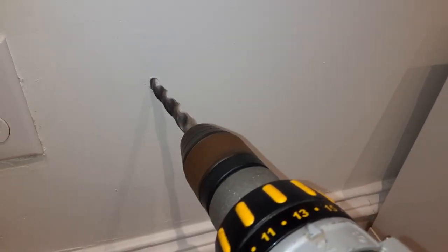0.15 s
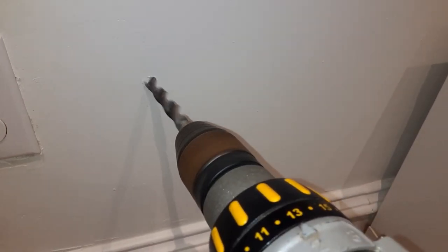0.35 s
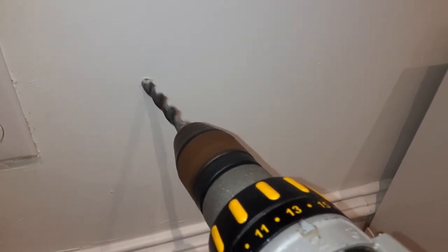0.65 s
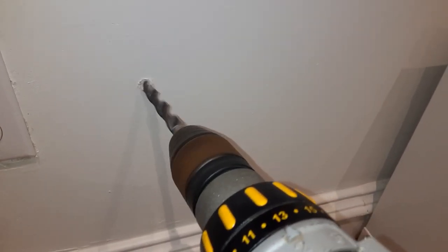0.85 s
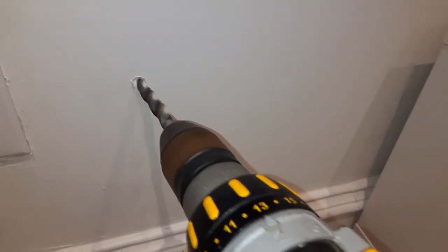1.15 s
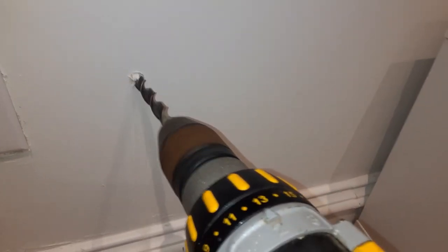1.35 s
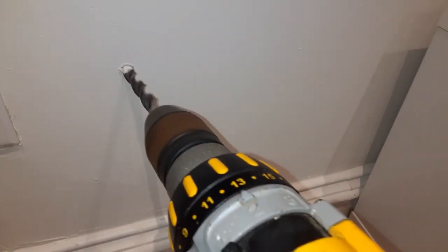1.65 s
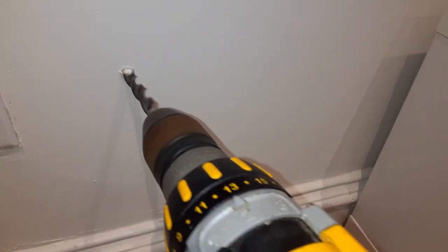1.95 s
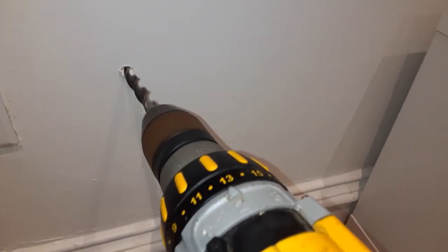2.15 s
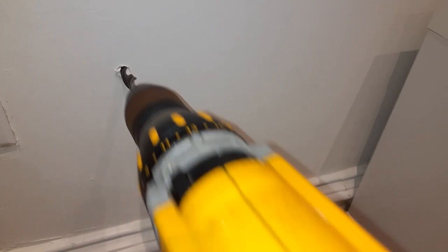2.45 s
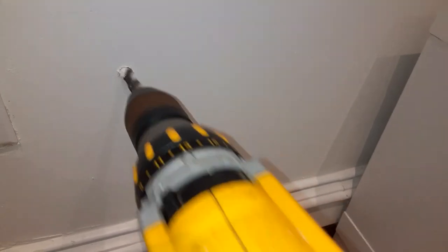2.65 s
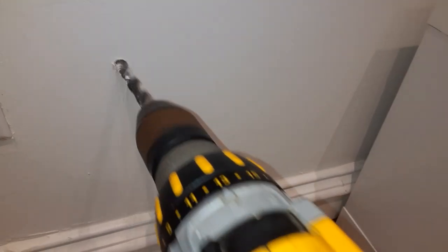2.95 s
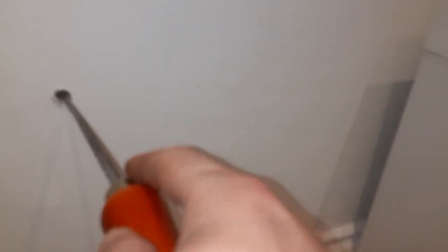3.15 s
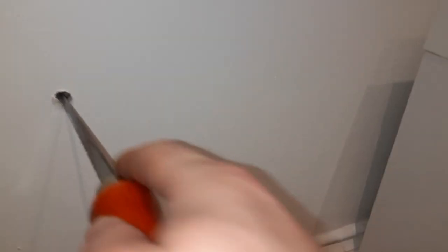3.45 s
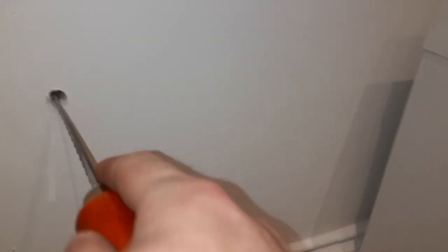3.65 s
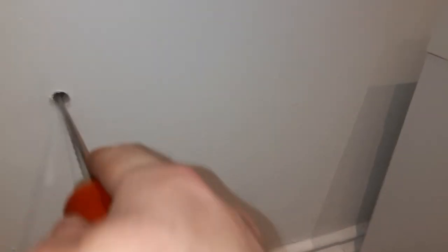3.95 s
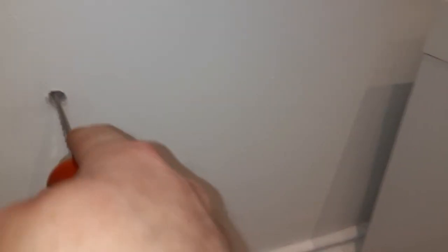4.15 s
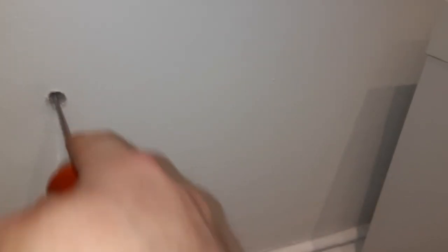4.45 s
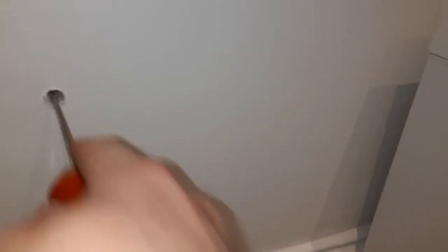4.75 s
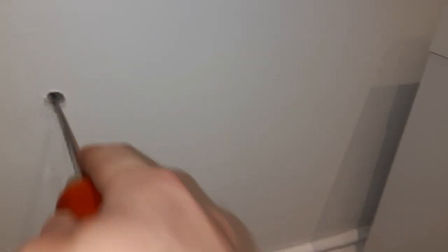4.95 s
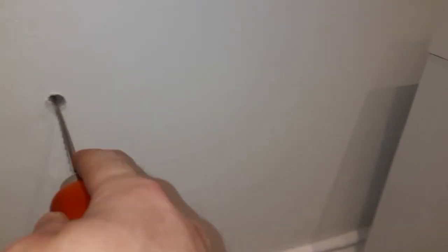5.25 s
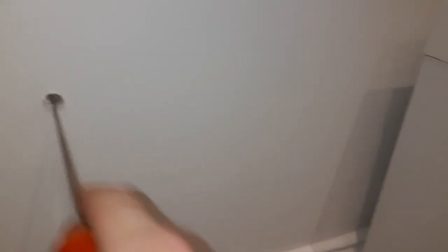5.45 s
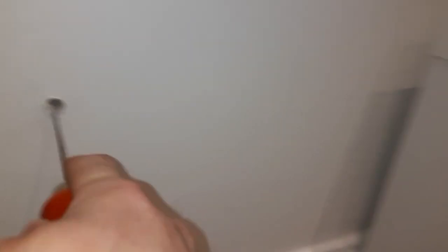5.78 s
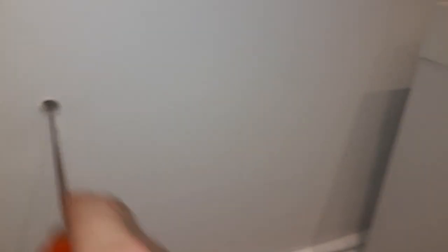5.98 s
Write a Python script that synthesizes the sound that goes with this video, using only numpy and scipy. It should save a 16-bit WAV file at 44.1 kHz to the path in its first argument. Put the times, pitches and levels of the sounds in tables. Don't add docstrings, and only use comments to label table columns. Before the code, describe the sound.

In a small quiet room, close to the microphone, a cordless drill spins up with short high squeals, then holds a steady whine with gear rattle and fan hiss. Dull knocks shake the hollow wall. Halfway it cuts off abruptly to a jab saw, hesitant at first, then working quickly to and fro with booming thumps, gritty hiss and crackling chips.

```python
import sys
import numpy as np
from scipy import signal
from scipy.fft import rfft, irfft
from scipy.io import wavfile
from scipy.ndimage import uniform_filter1d

SR = 44100
rng = np.random.default_rng(int(sys.argv[2]) if len(sys.argv) > 2 else 0)


def invert_db(x):
    u = np.asarray(x, float) / 20
    return 10 ** u


def master(y):
    cut = np.clip(np.atleast_2d(y).T, -1, 1)
    pcm = np.round(cut * 32767)
    wavfile.write(sys.argv[1], SR, pcm.astype(np.int16))


N = 269892
T = np.arange(N) / SR
HZ = np.maximum(np.arange(N // 2 + 1) * SR / N, 1)


def level(x, db):
    return x * invert_db(db) / np.sqrt(np.mean(x ** 2))


def along(table, hz):
    f, v = np.transpose(table)
    return np.interp(np.log(hz), np.log(f), v)


def curves(table):
    s, *columns = np.transpose(table)
    return [np.interp(T, s, c) for c in columns]


def band(x, lo_hz, hi_hz):
    edges_hz = [lo_hz, min(hi_hz, .45 * SR)]
    return signal.sosfilt(signal.butter(3, edges_hz, "band", fs=SR, output="sos"), x)


def walk(rate_hz):
    k = int(SR / rate_hz)
    held = np.repeat(rng.standard_normal(N // k + 1), k)
    return 0.93 * uniform_filter1d(uniform_filter1d(held, k), k)[:N]


def hump(start_s, end_s, edge_s, fall=1.):
    rise = 1 + np.exp(np.clip((start_s - T) / edge_s, -50, 50))
    return 1 / (rise * (1 + np.exp(np.clip((T - end_s) / (edge_s * fall), -50, 50))))


def ring(modes, length_s):
    t = np.arange(int(length_s * SR)) / SR
    return sum(invert_db(db - 60 * t / t60_s) * np.cos(2 * np.pi * hz * t) for hz, db, t60_s in modes)


def strike(force, response):
    return np.convolve(force, response)[:len(force)]


def ports(x, side, lag):
    turn = np.array([[1], [-1]]) / 2
    delay = np.exp(-2j * np.pi * turn * lag * HZ / SR)
    return irfft(rfft(x) * invert_db(turn * along(side, HZ)) * delay, N)


def hiss(gate, colour, side, lag, alike_hz):
    same = 0.012 + .88 / (1 + (HZ / alike_hz) ** 2)
    near, left, right = rfft(gate * rng.standard_normal((3, N))) * invert_db(along(colour, HZ))
    echoes = rfft(rng.standard_normal((2, 400)) * invert_db(-60 * T[:400] / 0.016), N)
    close = .75 / (1 + (HZ / 7000) ** 2)
    far = np.sqrt(1 - close) * np.array([left, right])
    far = far + np.sqrt(close) * near * echoes / np.abs(echoes)
    apart = np.sqrt(1 - same) * far * invert_db(np.array([[.5], [-.5]]) * along(side, HZ))
    return ports(irfft(near * np.sqrt(same), N), side, lag) + irfft(apart, N)


# freq_hz, density_db_per_hz
ROOM_COLOUR = [(24, -41), (40, 5), (99, 0), (209, -6), (269, -6.5), (646, -13), (697, -8), (1480, -13.5),
               (3000, -23), (16000, -40.5)]
# freq_hz, left_minus_right_db
SAW_SIDE = [(60, -5.5), (110, -3.5), (200, -4.5), (380, -2.5), (700, -3.5), (1290, 1), (2380, -5.5),
            (4400, -2), (8120, 2.5), (15000, 12)]


def room():
    return level(hiss(invert_db(2.0 * walk(16)), ROOM_COLOUR, SAW_SIDE, -5.0, 1000), -46.5)


# freq_hz, density_db_per_hz
BLADE = [(600, -8), (900, -3), (1500, -4), (1830, -9), (2170, -5.5), (2500, -11), (3100, -12.5), (4450, -7),
         (5300, -12), (6050, -13), (8800, -14), (10200, -18), (12100, -14), (16000, -19)]
# freq_hz, width_hz, level_db
BLADE_RINGS = [(1600, 310, -18.5), (2124, 190, -12.5), (2710, 200, -17), (4400, 350, -14), (5980, 230, -16),
               (7540, 250, -25), (8900, 330, -17), (11870, 400, -19.5)]
# start_s, end_s, level_db, swell_db, low_scrape_db
RUBS = [(3.193, 3.216, -49.5, 0, 2), (3.44, 3.53, -58.5, -6, -1), (3.542, 3.574, -42, 1, 0.5),
        (3.588, 3.598, -42.5, 0, 7), (3.624, 3.636, -44.5, 2.5, 6.5), (3.702, 3.757, -43.5, 2, -2.5),
        (3.788, 3.914, -38.5, 4.5, 1), (3.955, 4.055, -43, 4, -1), (4.085, 4.187, -37.5, 2.5, 0.5),
        (4.229, 4.327, -44, 2.5, -5.5), (4.374, 4.476, -39.5, -1, -1.5), (4.528, 4.622, -47, 3, -5),
        (4.672, 4.766, -39.5, 3, 0.5), (4.795, 4.857, -53, 1, -6), (4.85, 4.918, -43.5, 0, -4.5),
        (4.959, 5.06, -38, 1.5, 0), (5.081, 5.105, -50, 0, 3), (5.125, 5.2, -41, -2.5, -1.5),
        (5.237, 5.249, -45, 0.5, 2), (5.265, 5.333, -37, 2.5, -1), (5.354, 5.376, -49, 2, 5),
        (5.389, 5.486, -43, 4, 2.5), (5.51, 5.53, -50.5, 0, 9), (5.548, 5.627, -36.5, -1, 0),
        (5.66, 5.747, -44.5, -1, -0.5), (5.787, 5.876, -36.5, 1.5, 1.5), (5.894, 5.935, -48, 4, -1),
        (5.938, 6.013, -42, -1.5, -1), (6.042, 6.062, -41, 0, 3), (6.062, 6.16, -35, 2, 1.5)]
# start_s, peak_db, dull_part_db
CHIPS = [(3.1987, -33.5, -7), (3.232, -37, -12), (3.546, -30, 5), (3.57, -31, 1), (3.5908, -31, 8),
         (3.62, -34, -9), (3.633, -23.5, 4), (3.702, -33.5, -5), (3.7186, -24.5, 0), (3.7808, -36, -2),
         (3.8418, -21, 4), (3.9738, -37, 0), (4.1077, -30, 2), (4.2904, -33, 3), (4.3707, -37, 3),
         (4.6614, -33, 2), (4.957, -35, 0), (5.0003, -28, 2), (5.1192, -35, 5), (5.186, -29, 2),
         (5.414, -27, 10), (5.4445, -28.5, -3), (5.5407, -33, 6), (5.781, -33, 9), (6.0446, -32, 3),
         (6.095, -24, -5), (3.8666, -30.5, 18), (4.0145, -25, 1), (4.081, -33, 3), (4.127, -30, 17.5),
         (4.2428, -32, -5), (4.272, -37.5, 19), (4.336, -23, -8), (4.53, -36, 0), (4.8221, -28.5, 0),
         (4.858, -32, 14), (5.231, -30, 3), (5.265, -33, 15), (5.2879, -23, 5), (5.3898, -26.5, 5),
         (5.511, -31, 11), (5.671, -31.5, 10), (5.8016, -27, 8), (5.705, -37, 24), (5.942, -36, 6),
         (5.9994, -33.5, 21), (6.065, -33.5, 11)]
# freq_hz, level_db, t60_s
SNAP_MODES = [(1, -3, .025), (254, 7.5, 0.089), (292, 5.5, 0.06), (373, 7.5, 0.041), (470, -6, 0.054),
              (604, 1, 0.11), (760, -30, .03), (1500, -10, .012)]


def dust(slips):
    in_air = hump(3.56, 7, .012)
    rub, scrape = invert_db(-53.5) * in_air, invert_db(-51) * in_air
    for start_s, end_s, db, swell_db, low_db in RUBS:
        place = 2 * (T - start_s) / (end_s - start_s)
        swell = invert_db(db + swell_db * np.clip(place - 1, -1, 1))
        stroke = hump(start_s, end_s, 0.0046) * swell
        rub = rub + stroke
        scrape = scrape + stroke * invert_db(low_db - 6.5 * np.clip(place - 1.1, -1, 1) ** 2)
    puffs = strike(slips, invert_db(-60 * T[:900] / 0.019))
    grain_db = 4.45 * walk(500) + 1.9 * walk(70) + 0.44 * walk(28)
    grit = hiss(invert_db(grain_db), BLADE, SAW_SIDE, -3.5, 2100)
    out = level(band(grit, 2850, 21400), -0.85) * rub * (1 + 0.41 * puffs)
    out += level(band(grit, 800, 2600), -0.33) * scrape * (1 + 0.73 * puffs)
    faint = invert_db(-52) * hump(3.37, 3.55, .02)
    steel = np.roll(grit, N // 3, axis=1)
    for hz, width_hz, db in BLADE_RINGS:
        tone = level(band(steel, hz - width_hz / 2, hz + width_hz / 2), db)
        out += tone * (rub + faint * (hz > 7000)) * invert_db(5.2 * walk(25))
    return out + chips()


def chips():
    flash = invert_db(-60 * T[:900] / .021) * np.minimum(T[:900] / .0005, 1)
    bright, dull = np.zeros(N), np.zeros(N)
    for start_s, db, dull_db in CHIPS:
        i = int(start_s * SR)
        bright[i:][:900] += flash[:N - i] * invert_db(db)
        dull[i] += invert_db(db + dull_db)
    crack = hiss(np.ones(N), BLADE, SAW_SIDE, -18.0, 2300)
    out = level(band(crack, 830, 17500), -1.6) * bright
    out += ports(band(dull, 650, 3800) * invert_db(6), SAW_SIDE, -8.0)
    board = band(strike(dull, ring(SNAP_MODES, .08)), 186, 810)
    return out + ports(board * invert_db(-18.0), SAW_SIDE, -9.0)


def jerk(width_s):
    u = (np.arange(200) / SR - .0008) / width_s
    return -u * np.exp(.5 - u ** 2 / 2)


# time_s, level_db
BITES = [(3.5924, -10.0), (3.6341, -13), (3.72, -12.5), (3.848, -9), (3.869, 0), (4.119, -7), (4.129, -1.5),
         (4.1382, -10.5), (4.2751, -9), (4.2844, -9), (4.2935, 1), (4.3038, -7), (4.3121, -9),
         (4.4237, -5.5), (4.5632, -13.5), (4.5705, -5), (4.58, -5), (4.5876, -5), (4.5969, -8.5),
         (4.6065, -9.5), (4.7195, -4), (4.8586, -10.0), (4.8734, -5.5), (4.8889, -13), (4.8973, -3),
         (5.0135, -4), (5.026, -2), (5.036, -6.0), (5.1601, -12), (5.1676, -14), (5.179, -7.5),
         (5.2872, -1), (5.302, -7), (5.3096, -5), (5.3195, -6), (5.4225, -3), (5.4303, 2), (5.438, 3),
         (5.4458, 4), (5.4531, 5), (5.4612, -3), (5.4718, -13), (5.5647, -9), (5.586, -3.5), (5.6065, -11),
         (5.6987, -2), (5.7085, -3), (5.716, -7.0), (5.7249, 3), (5.8304, -2), (5.8438, -2), (5.8517, -3.5),
         (5.9441, -7.5), (5.9527, -3.5), (5.963, -3.0), (5.9766, -7.5), (6.0004, -10), (6.0656, -4),
         (6.0842, -5), (6.097, -5.5)]


def tooth_times(start_s, end_s, bite_s, hz, pace):
    hard = [s for s, _ in BITES if start_s - .012 < s < end_s + .012] or [bite_s]
    k = np.arange(1, 16)
    gaps = (1 + 0.055 * pace[:30].reshape(2, -1) + 0.005 * k ** 2).clip(.6, 1.6) / hz
    between = []
    for a, b in zip(hard, hard[1:]):
        count = max(round((b - a) * hz), 1)
        between.append(np.linspace(a, b, count + 1)[1:])
    before, after = hard[0] - np.cumsum(gaps[0]), hard[-1] + np.cumsum(gaps[1])
    return np.concatenate([before, hard[:1], *between, after]) - .0008


def hard_bites():
    jerk_db, edge_db = 20.5, 23
    hard = np.zeros(N)
    for s, db in BITES:
        hard[int((s - .0008) * SR)] = invert_db(db)
    body = band(strike(hard, ring(SNAP_MODES, .08)), 170, 960)
    body += invert_db(jerk_db) * strike(hard, jerk(0.00057))
    edge = invert_db(jerk_db - edge_db) * strike(hard ** 1.9, jerk(.00013))
    return hard, invert_db(-17 - jerk_db) * (body + edge)


# freq_hz, level_db, t60_s
PANEL_MODES = [(75.2, 0.5, 0.14), (110.2, 0.5, 0.058), (138.8, -7.5, 0.12)]
# freq_hz, density_db_per_hz
BOARD = [(150, -20), (230, 0), (400, -4), (680, -9), (850, -21), (1100, -28), (2000, -60)]
# time_s, tooth_rate_hz
ARM = [(3.2, 93.4), (3.55, 108.3), (3.75, 92.5), (4.1, 91.8), (4.5, 116.6), (4.85, 116), (5.02, 107.4),
       (5.4, 117.4), (6.1, 116.4)]
# start_s, end_s, hardest_bite_s, panel_db, snap_over_panel_db
STROKES = [(3.233, 3.248, 3.2, -34.5, -14), (3.535, 3.606, 3.594, -24.5, -10),
           (3.626, 3.673, 3.636, -23.5, -18), (3.72, 3.774, 4.1, -32, -10),
           (3.821, 3.92, 3.869, -15.5, -8.5), (3.997, 4.055, 3.998, -21, -12),
           (4.119, 4.192, 4.128, -13.5, -10), (4.256, 4.341, 4.291, -16, -5),
           (4.398, 4.483, 4.432, -14, -7.5), (4.555, 4.634, 4.577, -17.5, -2.5),
           (4.694, 4.776, 4.742, -18.5, -6.5), (4.833, 4.935, 4.874, -17, -7.5),
           (4.985, 5.072, 5.028, -15, -9.5), (5.137, 5.227, 5.162, -17.5, -10),
           (5.287, 5.361, 5.305, -15, -8), (5.397, 5.505, 5.449, -13.5, -3.5),
           (5.55, 5.632, 5.59, -15, -8.5), (5.691, 5.749, 5.724, -12.5, -8),
           (5.801, 5.882, 5.847, -13.5, -10.5), (5.921, 6.035, 5.959, -15, -6.5),
           (6.063, 6.142, 6.105, -13.5, -8.5)]


def teeth():
    light_db = -10
    boom, snap, slips, grind = np.zeros((4, N))
    chance, sway = rng.standard_normal((len(STROKES), 2, 60)), walk(60)
    rate_hz = curves(ARM)[0]
    for (start_s, end_s, bite_s, db, snap_db), (pace, size) in zip(STROKES, chance):
        hz = rate_hz[int(bite_s * SR)]
        at = (tooth_times(start_s, end_s, bite_s, hz, pace) * SR).astype(int).clip(0, N - 1)
        kicks = np.zeros(N)
        kicks[at] = invert_db(1.6 * size[:len(at)])
        a, b = int((start_s - .1) * SR), min(int((end_s + .2) * SR), N)

        push = kicks * invert_db(2.3 * sway) * hump(start_s - .002, end_s - .012, .005, 1.63)
        low = band(strike(push[a:b], ring(PANEL_MODES, .15)), 48, 3900)
        low = signal.sosfiltfilt(signal.butter(2, 180, fs=SR, output="sos"), low)
        core = low[int(.1 * SR):int((end_s - start_s + .1) * SR)]
        boom[a:b] += low * invert_db(db) / np.sqrt(np.mean(core ** 2))

        force = kicks * (np.exp(-((T - bite_s) / .022) ** 2) + .3 * hump(start_s, end_s, .008))
        high = band(strike(force[a:b], ring(SNAP_MODES, .08)), 150, 2100)
        peak = np.sqrt(uniform_filter1d(high ** 2, 900).max())
        snap[a:b] += high * invert_db(db + snap_db + light_db) / peak

        press = np.exp(-((T - bite_s - .01) / 0.032) ** 2)
        press += 0.43 * hump(start_s - .01, end_s + 0.031, 0.013)
        grind += invert_db(db + snap_db) * press
        slips += np.abs(kicks) * hump(start_s, end_s, 0.011)
    hard, hard_snap = hard_bites()
    snap += hard_snap
    slips += 0.47 * hard
    boom = np.roll(boom, -int(.002 * SR))
    board = hiss(invert_db(2.0 * walk(150)), BOARD, SAW_SIDE, -9.5, 1500)
    murmur = grind * level(band(board, 237, 800), -8)
    shake = strike(rng.standard_normal(N), ring(PANEL_MODES, 0.13))
    boom += level(band(shake, 58.5, 194), -25.5) * hump(3.91, 8, 0.17)
    return murmur + ports(boom, SAW_SIDE, -11.0) + ports(snap, SAW_SIDE, -5.5), slips


# freq_hz, left_minus_right_db
DRILL_SIDE = [(60, -1), (110, -6), (200, -2.5), (380, -4), (700, -0.5), (1290, -0.5), (2380, -7.5),
              (4400, -1), (8120, -4), (15000, 4)]
# start_s, peak_db, pitch_hz
SQUEALS = [(0.0268, -15.5, 4540), (0.099, -15.5, 4470), (0.176, -17, 4620), (0.252, -12.5, 4370),
           (0.2656, -23, 4580), (0.31, -11.5, 4110), (0.315, -20, 4500), (3.0891, -11, 4500)]
# start_s, peak_db, pitch_hz
KNOCKS = [(0.445, -38, 105), (0.631, -28, 116.9), (0.894, -33, 96), (2.373, -20, 91.3), (2.578, -32, 93.9),
          (2.619, -39, 88.8), (2.712, -29, 108.1), (2.779, -29.5, 109.8), (2.809, -31.5, 80),
          (2.881, -27.5, 83.7), (3.069, -34.5, 86.3)]


def bit():
    squeals, knocks, t = np.zeros(N), np.zeros(N), np.arange(4000) / SR
    for s, db, hz in SQUEALS:
        swell = t / 0.0036 * np.exp(1 - t / 0.0034)
        tone = np.sin(2 * np.pi * hz * t * (1 + 0.88 * np.abs(t - .004)))
        squeals[int(s * SR):][:len(t)] += invert_db(db) * swell * tone
    for s, db, hz in KNOCKS:
        thump = t / 0.0086 * np.exp(1 - t / 0.0084) * np.sin(2 * np.pi * hz * t)
        tap = 0.65 * np.exp(-t / 0.0027) * np.sin(2 * np.pi * 330 * t)
        knocks[int(s * SR):][:len(t)] += invert_db(db) * (thump + tap)
    return ports(squeals, DRILL_SIDE, SR / 4550) + ports(knocks, DRILL_SIDE, -6.0)


# time_s, whine_hz
MOTOR_SPEED = [(0, 528), (.12, 597.5), (.28, 725.3), (.37, 837), (.43, 871), (.5, 899.5), (.7, 905),
               (1.2, 859), (2.76, 832), (3.04, 834), (3.15, 864)]


def speed():
    idle_hz, run_hz = 563, 815
    hz = uniform_filter1d(curves(MOTOR_SPEED)[0], size=2000)
    return hz, np.clip((hz - idle_hz) / (run_hz - idle_hz), 0, 1), hump(2.37, 9, 0.051)


# freq_hz, density_db_per_hz
HOUSING = [(560, -37.5), (950, 18.5), (1800, -22.5), (2150, -6), (2420, -13.5), (2760, -4.5), (3000, -9),
           (3350, -9.5), (3550, -9.5), (3920, -8.5), (4470, -9), (5090, -5.5), (6670, -9), (7870, -9),
           (11800, -16), (13900, -11.5), (16000, -21)]
# freq_hz, density_db_per_hz
CASING = [(150, -20), (220, -18.5), (500, -16.5), (680, -7), (940, 1.5), (1100, -7), (1300, -8), (1520, -2),
          (1700, -9), (1850, -13.5), (2050, -24)]


def boring():
    _, spun, through = speed()
    slow = 1 - spun
    gear_db = -22.5
    housing_db = -0.14 + 0.5 * slow - 3 * through
    fan_db = -4.5 - 5 * slow + 0.5 * T - 2.5 * through
    teeth_db = 2.0 * walk(700) + 1.0 * walk(29.96)
    rattle, ringing = (hiss(invert_db(teeth_db), HOUSING, DRILL_SIDE, 10.2, 910) for _ in range(2))

    housing = band(band(ringing, 4580, 5310), 4550, 6300)
    scrape = band(band(np.roll(ringing, N // 3, axis=1), 5190, 5940), 4970, 6600)
    housing += scrape * invert_db(np.minimum(-12 + 7.5 * T, -1))

    patch_db = 1.5
    out = level(band(rattle, 1880, 3380), -6.0) * invert_db(patch_db * walk(39.93))
    out += level(band(rattle, 3300, 4310), -0.68) * invert_db(-0.84 * T + patch_db * walk(45))
    out += level(housing, -1.0) * invert_db(housing_db + patch_db * walk(35.03))
    out += level(band(rattle, 5600, 16500), 0.11) * invert_db(fan_db)
    out += level(band(ringing[:, ::-1], 2040, 2260), -13.5) * spun * invert_db(-2 * T)

    casing = hiss(invert_db(2.0 * walk(200)), CASING, DRILL_SIDE, 12.5, 1960)
    drone = level(band(casing[:, ::-1], 770, 996), -12.5) * (1 - spun ** 3)
    out += level(casing, -6.5) + drone

    jolts = sum(invert_db(db - KNOCKS[3][1]) ** .5 * np.exp(-((T - s - .03) / 0.036) ** 2) for s, db, _ in KNOCKS)
    wall_db = -21.5 + 3.5 * through + 7 * np.minimum(jolts, 1)
    shake = strike(invert_db(3.9 * walk(33.0)) * rng.standard_normal(N), ring(PANEL_MODES, 0.089))
    out += level(ports(band(shake, 55, 194), DRILL_SIDE, -8.5), -0.51) * invert_db(wall_db)
    return out * invert_db(gear_db)


def rim_song():
    dips = sum(np.exp(-((T - s) / 0.015) ** 2) for s, *_ in SQUEALS)
    rim_hz = 4790 + 257 * T - 130.7 * dips.clip(0, 1)
    rim_db = -29 - 300 * np.maximum(T - 0.31, 0)
    return invert_db(rim_db + 4.8 * walk(40)) * np.sin(2 * np.pi * np.cumsum(rim_hz) / SR + walk(40))


# whine_hz, whine_db, second_db, third_db, gear_mesh_db
RESPONSE = [(507, -46.5, -35.5, -36.5, -39), (640, -41.5, -36.5, -48, -35.5),
            (730, -24.5, -35.5, -48.5, -30.5), (820, -17.5, -44, -42.5, -36.5), (825, -23, -45, -53, -32),
            (848.6, -21.5, -53.5, -46, -31), (845.7, -21, -57, -45, -30.5), (847.3, -23, -59, -45, -32),
            (864, -22, -55, -39.5, -29), (905, -23.5, -48, -35.5, -24.5)]
# multiple_of_whine, level_db
SHAFT_LINES = [(0.196, -41), (.39, -53), (.8, -46), (1.56, -44), (1.8, -53), (2.251, -46.5), (2.341, -58),
               (4, -45.5), (4.692, -35.5)]
# multiple_of_whine, level_db
UPPER_LINES = [(3.55, -43), (5, -40), (5.95, -38.5), (6.94, -41), (9, -44)]
# multiple_of_whine, level_db
SPIN_UP_LINES = [(2.171, -44.5), (5, -41)]


def motor():
    hz, spun, through = speed()
    at_hz, *rows = np.transpose(RESPONSE)
    whine_db, second_db, third_db, mesh_db = (np.interp(hz, at_hz, row) for row in rows)
    shaft_db = -10 * (1 - spun) - 4 * through
    upper_db = -18.5 + 10 * np.minimum(T, 2.36) - 6 * hump(2.75, 9, 0.078)
    turn = 2 * np.pi * np.cumsum(hz * (1 + 0.00365 * walk(59.6))) / SR
    whine = np.sqrt(2) * invert_db(whine_db + 0.95 * T + 0.88 * walk(40.02)) * np.sin(turn)
    out = ports(whine, DRILL_SIDE, 3.1)

    worn_db = 1.0 + np.clip(26 * (T - 1.75), 0, 9.0)
    throb_db = 3 * np.sin(turn / 75) + 4 * np.sin(turn / 25)
    lines = [(2, second_db), (3, third_db), (4.5, mesh_db - worn_db + throb_db)]
    lines += [(k, db + shaft_db) for k, db in SHAFT_LINES]
    lines += [(k, db + upper_db) for k, db in UPPER_LINES]
    lines += [(k, db - 25 * spun ** 3) for k, db in SPIN_UP_LINES]
    drift = np.array([walk(6.7), walk(10), walk(70)])
    for count, (k, db) in enumerate(lines):
        path, own, flutter = np.roll(drift, 17011 * count, axis=1)
        lean_db = along(DRILL_SIDE, 860 * k) * np.array([[.5], [-.5]])
        shift = min(k / 6, .6) * np.array([path, own])
        shiver_db = .9 * min(k, 3.5) * flutter + 3.8 * own * (k < 1 or k >= 5)
        wobble = .08 * k * flutter[::-1]
        phase = k * turn + shift + wobble - np.array([[k / 4], [0]])
        out += np.sqrt(2) * invert_db(db + lean_db + shiver_db) * np.sin(phase)
    return out + rim_song()


# time_s, level_db
DRILL_OUT = [(0, 0), (3.1553, 0), (3.1561, -26), (3.163, -36), (3.166, -70), (7, -70)]
# time_s, level_db
SAW_IN = [(0, -90), (3.166, -90), (3.167, -45), (3.187, -40), (3.194, 0), (7, 0)]


def scene():
    wall, slips = teeth()
    drill = (motor() + boring() + bit()) * invert_db(curves(DRILL_OUT)[0])
    return drill + (wall + dust(slips) + room()) * invert_db(curves(SAW_IN)[0])


def band_limit(x):
    return signal.sosfilt(signal.butter(12, 16000, fs=SR, output="sos"), x)


def record(dry):
    cut = signal.sosfilt(signal.butter(2, 42, "high", fs=SR, output="sos"), dry)
    rounded = np.tanh(0.81 * cut) / 0.79
    mix = signal.sosfilt(signal.ellip(8, .2, 60, 15950, fs=SR, output="sos"), rounded)
    return band_limit(mix)


dry = scene()
out = record(dry)
master(out)
```